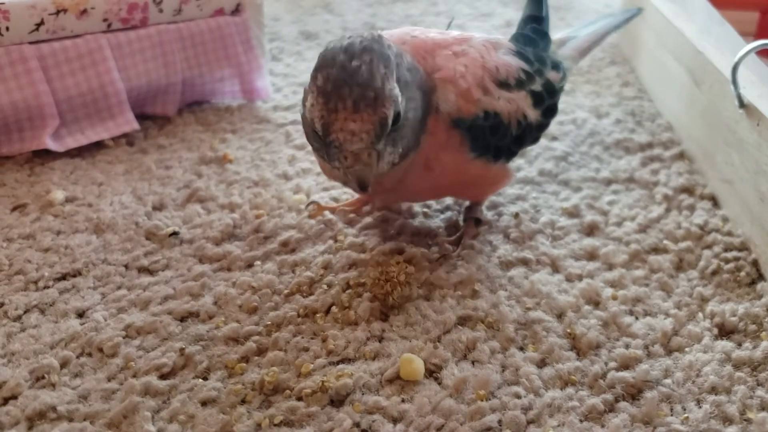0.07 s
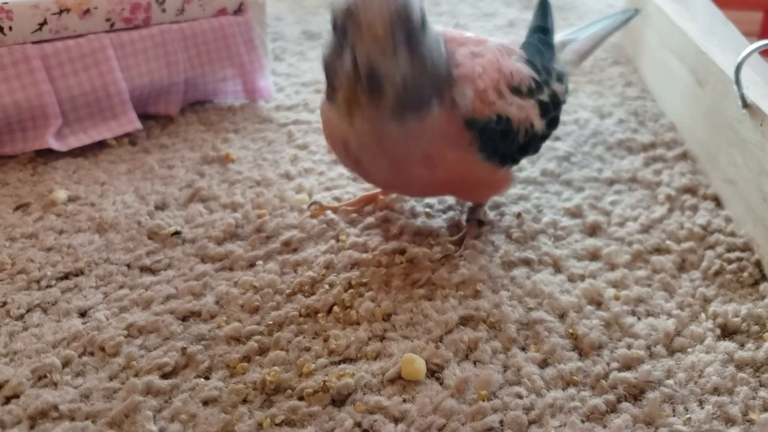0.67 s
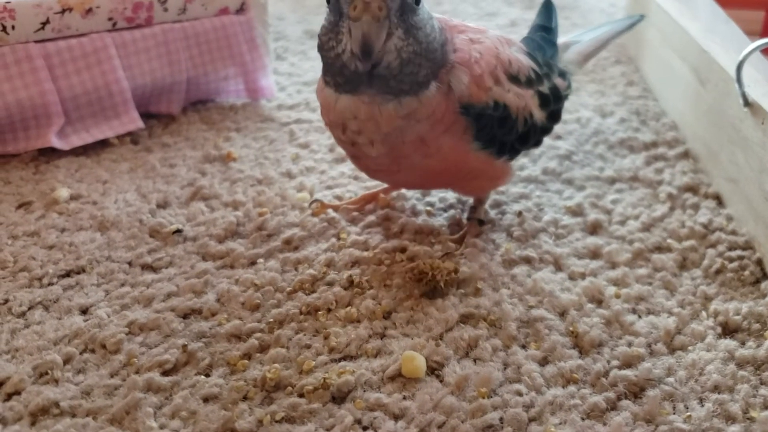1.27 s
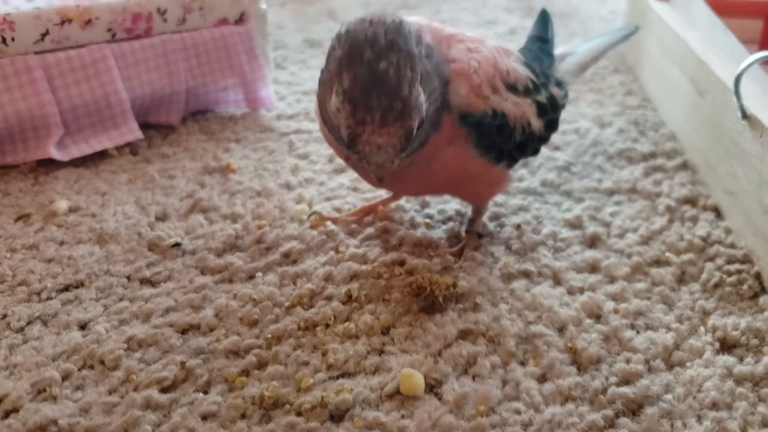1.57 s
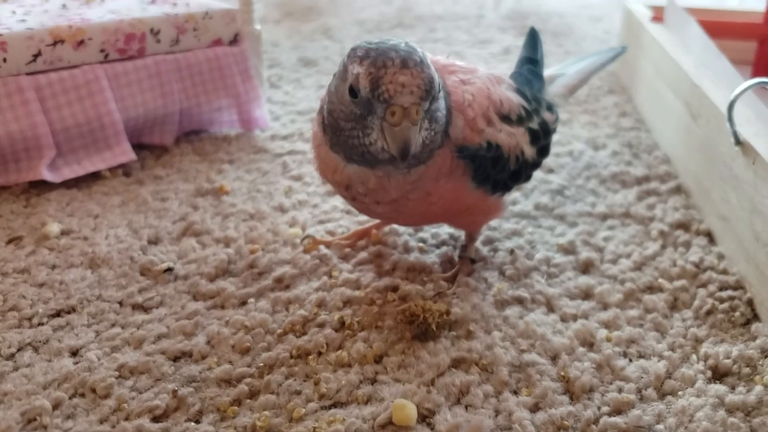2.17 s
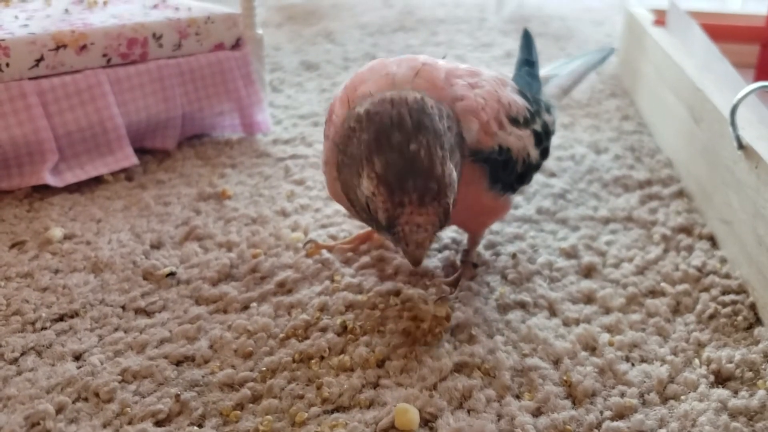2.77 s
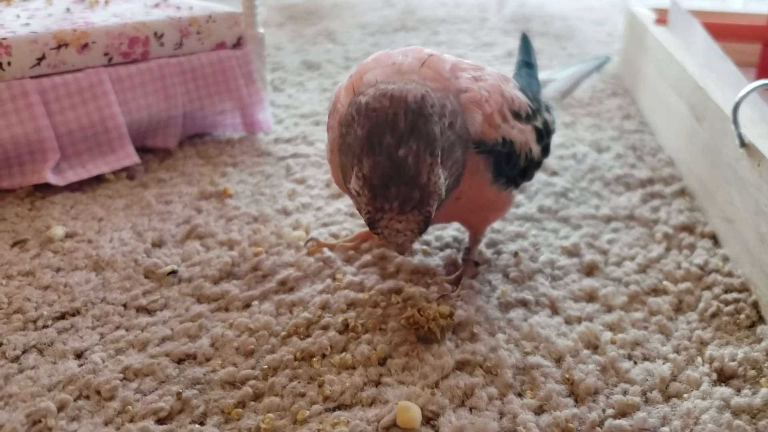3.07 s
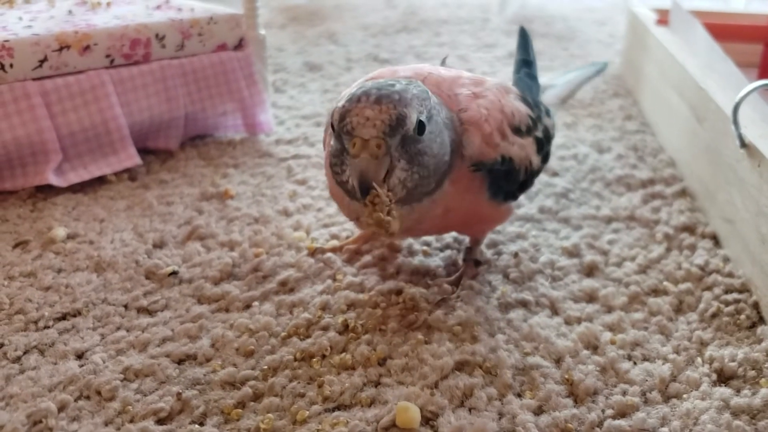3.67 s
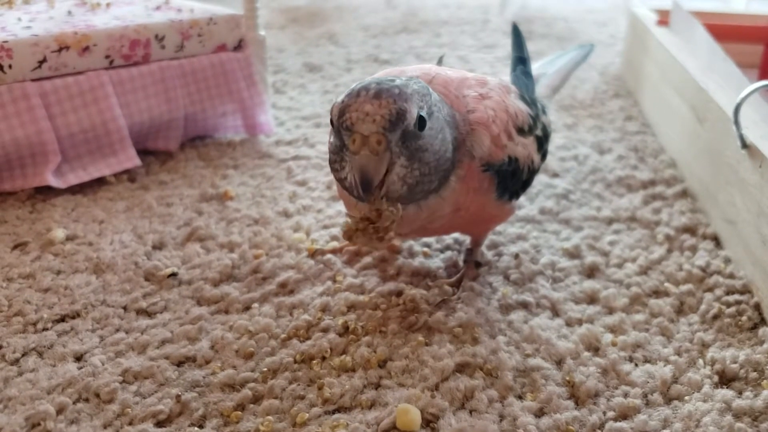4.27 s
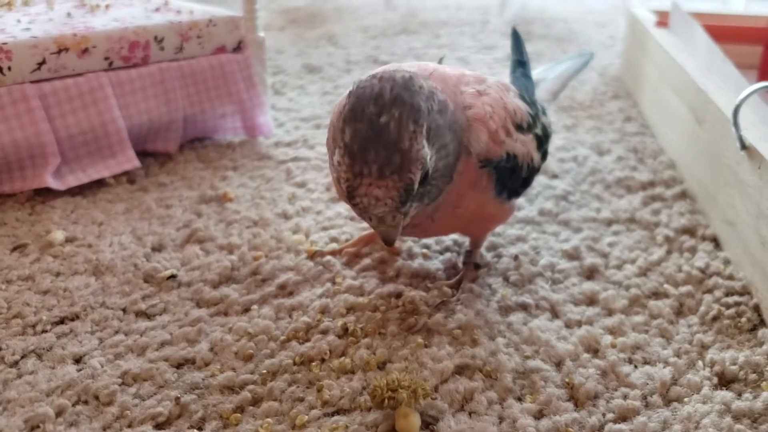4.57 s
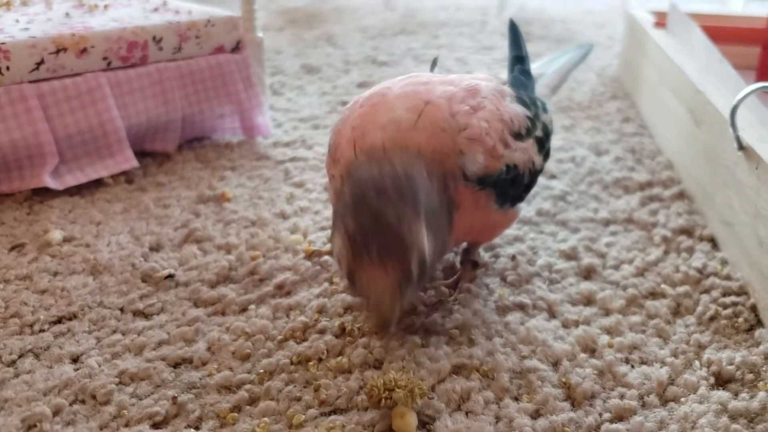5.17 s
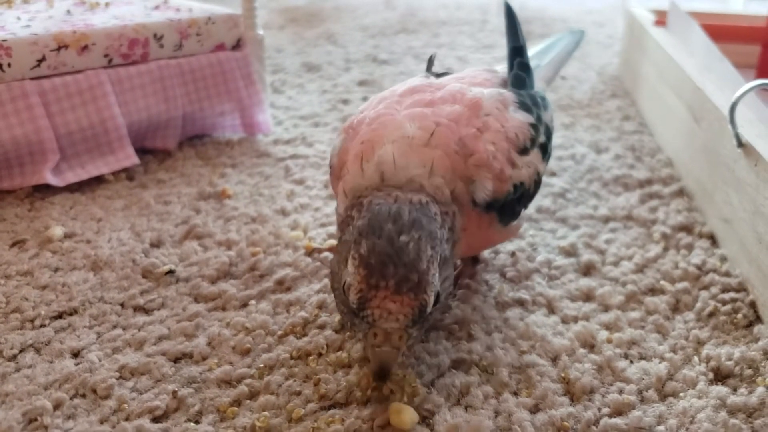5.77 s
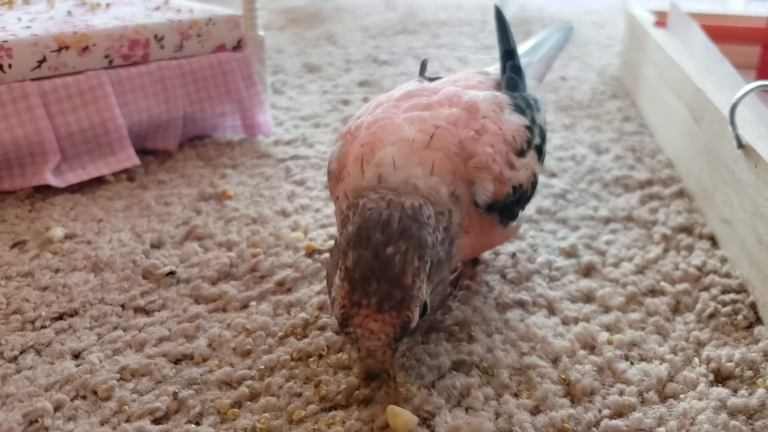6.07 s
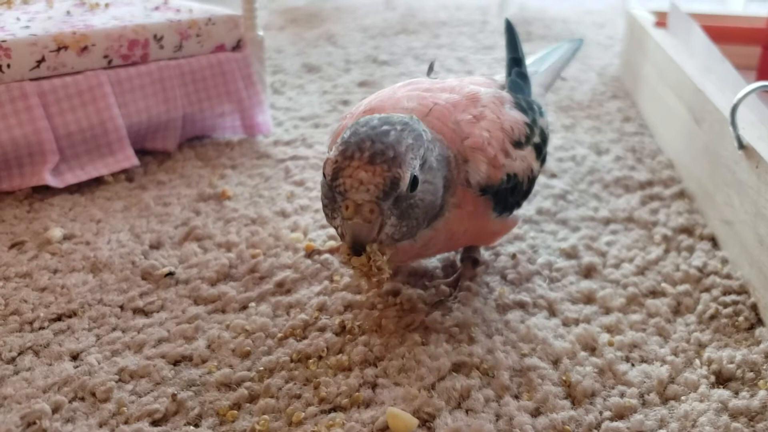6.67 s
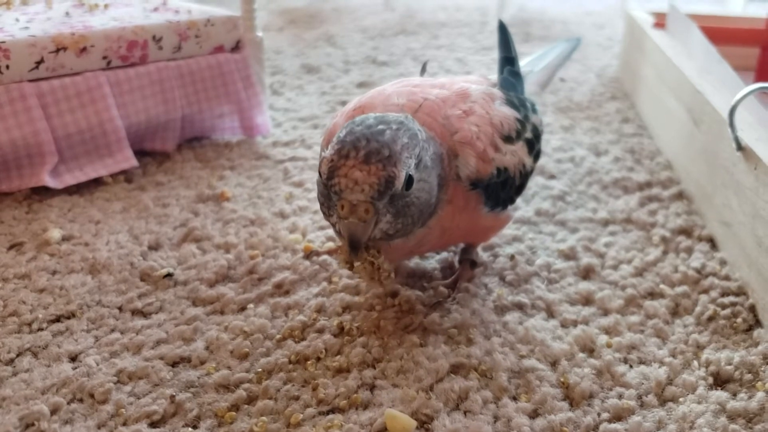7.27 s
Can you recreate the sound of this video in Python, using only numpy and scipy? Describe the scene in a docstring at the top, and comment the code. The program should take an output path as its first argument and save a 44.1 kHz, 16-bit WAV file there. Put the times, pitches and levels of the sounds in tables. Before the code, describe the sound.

A parakeet eats millet on a carpet, close to the microphone in a quiet room with very little ring. Throughout, distant traffic comes through the walls as a low, wavering engine hum and soft rumble, with a faint steady hiss.

Tiny, crisp seed clicks and a dry husk rustle sound right at the start and around 0.5 seconds. A quick cluster of sharper cracks follows between 1.1 and 1.4 seconds, and the loudest single snap lands at about 2.1 seconds. From 2.3 to 4.5 seconds there are faint ticks, brief rustling tugs and a couple of soft pecks, while the traffic gently swells. Another clear crack comes at 4.7 seconds, then a short lull. From about 5.7 to 7 seconds the bird resumes rustling the husks, with a light peck and several small clicks, as the rumble swells once more.

```python
"""Parakeet picking at millet

Distant traffic hums and rumbles through the walls, over faint microphone hiss.
Close by, on a carpet, a parakeet snaps seeds in its beak, tugs at the dry, rustling husks and pecks.
Snaps, rustle and pecks ring the resonances of beak and seed, followed by the short ring of the room."""
import sys
import numpy as np
from scipy import signal
from scipy.fft import rfft, irfft
from scipy.io import wavfile

SR = 44100
rng = np.random.default_rng(int(sys.argv[2]) if len(sys.argv) > 2 else 0)


def persist_wave(psi):
    """Save psi, clipped to +-1, as 16-bit WAV."""
    counts = np.round(np.clip(psi, -1, 1) * 32767).astype(np.int16)
    wavfile.write(sys.argv[1], SR, np.atleast_2d(counts).T)


N = 322812
TIME = np.arange(N) / SR
SAMPLES_PER_MS = SR / 1000


def from_db(db):
    """Decibels to gain."""
    return 10 ** (np.asarray(db) / 20)


def unit_rms(x):
    """Scale to rms 1."""
    return x / np.sqrt(np.mean(x ** 2) + 1e-30)


def in_time(rows):
    """Columns of a time curve, interpolated per sample."""
    times_s, *columns = np.transpose(rows)
    return [np.interp(TIME, times_s, column) for column in columns]


def at_hz(points, hz):
    """Interpolate on a log-frequency axis."""
    known_hz, values = np.transpose(points)
    return np.interp(np.log(hz + 1), np.log(known_hz), values)


def drift(corner_hz):
    """Low-passed random control signal, rms 1."""
    grid_s = np.linspace(0, TIME[-1], 4096)
    hz = np.arange(len(grid_s) // 2 + 1) / grid_s[-1]
    slow = irfft(rfft(rng.standard_normal(len(grid_s))) / (1 + (hz / corner_hz) ** 2))
    return np.interp(TIME, grid_s, unit_rms(slow))


def panned(pan_db):
    """Stereo gains for a left-minus-right level."""
    return from_db(np.array([[.5], [-.5]]) * pan_db)


# Background stereo image: (frequency [Hz], coherence [0..1])
COHERENCE = [(25, .88), (60, .96), (85, .98), (130, .94), (300, .68), (700, .5), (1100, 0)]
# (frequency [Hz], left minus right [dB])
BALANCE = [(40, 1.2), (150, 2.5), (400, 5.9), (1000, 5), (2500, 0.63), (5000, 1), (7000, 2.8), (9000, 1.2),
           (15000, 9.5)]


def stereo_noise(spectrum):
    """Coloured noise, coherent in the bass, independent in the treble; rms 1."""
    hz = np.arange(N // 2 + 1) * SR / N
    mid, side = rfft(rng.standard_normal((2, N)))
    coherence = at_hz(COHERENCE, hz)
    pair = np.sqrt(1 + coherence) * mid + np.sqrt(1 - coherence) * side * [[1], [-1]]
    coloured = pair * from_db(at_hz(spectrum, hz)) * panned(at_hz(BALANCE, hz))
    return unit_rms(irfft(coloured, N))


# Far engines: (time [s], firing rate [Hz], hum [dB], drone [dB])
FIRST_ENGINE = [(0, 83.6, -48.5, -88), (0.45, 85.3, -49, -86), (0.95, 86.3, -48.5, -82),
                (1.9, 88, -62.5, -84.5), (2.35, 88.77, -54, -76), (2.7, 89.96, -52.5, -80),
                (3.05, 93.1, -57.5, -96), (4.2, 95.4, -64.5, -99.5), (7.3, 102.2, -72.5, -90)]
SECOND_ENGINE = [(0, 71.06, -82, -92), (1, 73, -65.5, -79), (1.8, 78.2, -58, -91),
                 (2.2, 77.63, -51.5, -78.5), (3.3, 81.4, -49.5, -82.5), (3.95, 80.7, -57.5, -90),
                 (4.7, 80.1, -56.5, -82), (5.75, 80.72, -49, -91.5), (6.5, 82.52, -52, -89.5),
                 (7.1, 85.15, -50.5, -90), (7.32, 85.1, -58, -86.5)]
# Hum harmonics: (order, level re hum [dB])
HUM_HARMONICS = [(1, -0.5), (2, -24), (3, -31)]


def engine(curve, waver_db=2.5, wander=.004):
    """Hum at the firing rate and a thin drone two octaves up, wavering through the walls."""
    firing_hz, hum_db, drone_db = in_time(curve)
    phase = 2 * np.pi * np.cumsum(firing_hz * (1 + wander * drift(4.13))) / SR
    partials = [(order, hum_db + db) for order, db in HUM_HARMONICS] + [(4, drone_db)]
    hum = 0
    for order, level_db in partials:
        gain = from_db(level_db + waver_db * drift(8.4))
        hum += gain * np.sin(order * phase + rng.uniform(0, 2 * np.pi))
    return np.sqrt(2) * hum * panned(5.14)


# Road noise spectra: (frequency [Hz], relative density [dB])
RUMBLE_SPECTRUM = [(20, -14.5), (35, -9.5), (55, 4.5), (80, -3), (115, 3.5), (145, -5), (185, -8.5),
                   (225, -11), (275, -17.5), (400, -48.5)]
ROAR_SPECTRUM = [(150, -11), (230, -5.5), (280, 1.5), (325, -11.5), (370, -5), (410, -14), (480, -8),
                 (580, -26), (900, -63)]
TYRE_SPECTRUM = [(300, -25.5), (520, 0), (680, 2.5), (850, -0.5), (1020, 1), (1250, -7.5), (2000, -26),
                 (5000, -35)]
# Passing vehicles: (nearest at [s], half-width [s], rumble [dB], roar [dB], tyres [dB])
PASSES = [(2.419, 0.4, -63.5, -69.5, -88), (3.58, 0.29, -59, -70, -76.5), (4.4, 0.12, -84, -70, -86.5),
          (4.73, 0.1, -54, -75.5, -86.5), (6.1, 0.45, -59.5, -72.5, -80)]


def road(rumble_db=-60, roar_db=-75.5, tyre_db=-82.5):
    """Muffled road noise; each vehicle swells and fades over a steady bed."""
    power = from_db([[rumble_db], [roar_db], [tyre_db]]) ** 2
    for nearest_s, half_s, *levels_db in PASSES:
        swell = 2 ** -(((TIME - nearest_s) / half_s) ** 2)
        power = power + np.outer(from_db(levels_db) ** 2, swell)
    spectra = RUMBLE_SPECTRUM, ROAR_SPECTRUM, TYRE_SPECTRUM
    return sum(gain * stereo_noise(spectrum) for gain, spectrum in zip(np.sqrt(power), spectra))


# Traffic boom: (time [s], level [dB])
BOOM_LEVEL = [(0, -70.5), (1.6, -81.5), (2.5, -67), (3.0, -71.5), (3.6, -67), (4.3, -67.5), (4.7, -68),
              (5.1, -67.5), (6.1, -62.5), (7.3, -65)]
# (frequency [Hz], relative density [dB])
BOOM_SPECTRUM = [(100, -31), (160, -7), (184, 10.5), (200, -3), (222, -2.5), (260, -27), (500, -71)]


def boom():
    """Noise peaking near 185 Hz; grows as the traffic thickens."""
    level_db, = in_time(BOOM_LEVEL)
    return from_db(level_db) * stereo_noise(BOOM_SPECTRUM)


# Microphone noise: (frequency [Hz], relative density [dB])
HISS_SPECTRUM = [(300, -3.5), (1500, 7), (3000, 4), (5000, 0.5), (7300, -8), (8300, -22.5), (10000, -2.5),
                 (11500, 5.5), (15500, 2.5), (16500, -14.5)]


def hiss(level_db=-81.5):
    """Steady microphone noise floor."""
    return from_db(level_db) * stereo_noise(HISS_SPECTRUM)


def crack_force(times_s, levels_db, splinter=.1, splinter_s=.0004):
    """One impulse per event, then brief splintering; levels are rms over 1 ms."""
    age_s = np.arange(SR // 200) / SR
    cracks = splinter * rng.standard_normal((len(times_s), len(age_s))) * np.exp(-age_s / splinter_s)
    cracks[:, 0] = 1
    force = np.zeros(N)
    for time_s, level_db, crack in zip(times_s, levels_db, cracks):
        start = round(time_s * SR)
        gain = from_db(level_db) * np.sqrt(SAMPLES_PER_MS) / np.linalg.norm(crack)
        force[start:start + len(crack)] += gain * crack
    return force


# Seed snaps: (time [s], knock [dB], tick [dB], high snap [dB])
SEED_SNAPS = [(0.061, -64, -45, -43.5), (0.464, -74, -71, -51), (0.471, -74, -59, -49),
              (0.5185, -82, -64, -46), (0.536, -75, -53, -39.5), (0.5667, -85, -78, -52),
              (0.6025, -85, -75, -56), (0.9538, -74, -81, -55), (1.1264, -41, -44.5, -36.5),
              (1.1713, -76, -65, -55), (1.2592, -74, -66, -65), (1.3062, -60.5, -49.5, -35),
              (1.3112, -75, -50.5, -36), (1.3328, -81, -56, -43), (1.3449, -64, -51, -33),
              (1.3984, -76, -60.5, -55), (2.0741, -37, -32, -17.5), (2.2535, -72.5, -58, -48),
              (2.6326, -74, -76, -53), (2.8697, -73, -52, -49), (3.8487, -82, -71, -51.5),
              (3.8663, -86, -73, -51), (3.9716, -73, -73, -62), (4.0477, -74, -60, -50),
              (4.1691, -80.5, -83.5, -55), (4.2548, -69.5, -73, -74), (4.5893, -88, -65, -71),
              (4.6919, -74, -57.5, -53), (4.7201, -52, -43, -37), (6.1041, -79, -60, -52),
              (6.1387, -74, -58.5, -42.5), (6.5062, -87, -90, -54), (6.71, -84, -62, -51),
              (6.749, -76, -59, -41.5), (6.8662, -76, -61.5, -50)]


def seed_snaps(thud_re_tick_db=-16):
    """Shells give way in one step. Returns thud, knock, tick and snap forces."""
    times_s, knock_db, tick_db, snap_db = np.transpose(SEED_SNAPS)
    return [crack_force(times_s, db) for db in (tick_db + thud_re_tick_db, knock_db, tick_db, snap_db)]


def husk_force(grains_per_s=800, spread_db=4.0, rub_re_grains=.49):
    """Tiny husk fractures of uneven size over smooth rubbing; rms 1."""
    sizes = from_db(spread_db * np.minimum(rng.exponential(1, N), 3))
    grains = sizes * rng.choice([-1, 1], N) * (rng.random(N) < grains_per_s / SR)
    return unit_rms(unit_rms(grains) + rub_re_grains * rng.standard_normal(N))


def crumb_force(crumbs_per_s=30, re_rustle_db=6, spread_db=3.5):
    """Bits of husk break off at random."""
    sizes = from_db(re_rustle_db + spread_db * np.clip(rng.standard_normal(N), -2, 2))
    return np.sqrt(SAMPLES_PER_MS) * sizes * (rng.random(N) < crumbs_per_s / SR)


# Tugs at the sprig: (time [s], hold [s], husk [dB], stalk [dB], grip tilt [dB/mode])
TUGS = [(0.08, 0.044, -74, -85.5, 1), (0.48, 0.072, -66.5, -83, 0), (0.6, .4, -82, -95, -1.5),
        (1.13, 0.094, -88, -93, -4), (1.338, 0.077, -76, -84, -1), (2.265, 0.014, -73, -85, 1.5),
        (2.645, .01, -76, -91.5, 0.5), (2.89, .06, -82, -92, 0.5), (3.31, 0.15, -78, -84, -0.5),
        (3.5, .06, -70.5, -85.5, 2.5), (3.69, .05, -79, -96, 2), (3.87, 0.0047, -72, -89, 0),
        (4.05, 0.026, -65, -84, 2), (4.11, 0.066, -74, -90, 2.5), (4.28, 0.044, -76.5, -92, 1),
        (4.495, 0.0051, -83, -89, 0), (4.68, .15, -79, -93, 3), (4.94, .01, -80, -99.5, -0.5),
        (5.689, 0.051, -72, -89, -1.5), (5.835, .005, -76, -93, -0.5), (5.94, 0.033, -72.5, -85, -2),
        (6.09, 0.083, -69, -83, -1), (6.379, .04, -76.5, -82.5, -3), (6.47, 0.075, -74, -94.5, 5.5),
        (6.65, .05, -77, -85, 2), (6.72, 0.049, -65, -81, 0.5), (6.87, .12, -74, -93, 0.5),
        (7.21, .02, -83.5, -93, 0)]


def tugs(attack_s=.029, release_s=.042):
    """Each tug swells, holds and settles. Returns husk, stalk and crumb forces, and grip tilt."""
    power, tilt_sum_db, weight = 0, 0, 1e-3
    for time_s, hold_s, husk_db, stalk_db, tilt_db in TUGS:
        before = np.maximum(time_s - TIME, 0) / attack_s
        after = np.maximum(TIME - time_s - hold_s, 0) / release_s
        effort = np.exp(-2 * np.minimum(before + after, 20))
        power += from_db([[husk_db], [stalk_db]]) ** 2 * effort
        tilt_sum_db += tilt_db * effort
        weight += effort
    husk_gain, stalk_gain = np.sqrt(power)
    grains = husk_force()
    return grains * husk_gain, grains * stalk_gain, crumb_force() * husk_gain, tilt_sum_db / weight


def grip_gains(tilt_db, modes):
    """A brighter grip favours higher modes at constant total power; one gain curve per mode."""
    shares = from_db([[left_db] for _, _, left_db, _ in modes]) ** 2
    gains = from_db(np.outer(np.arange(len(modes)), tilt_db))
    return gains / np.sqrt((shares * gains ** 2).sum(0) / shares.sum())


# Pecks: (time [s], level [dB])
PECKS = [(1.8672, -68.5), (2.9417, -63), (3.5355, -65), (5.9415, -68)]


def carpet_pecks():
    """Force of the beak striking the carpet."""
    return crack_force(*np.transpose(PECKS))


def bandpass(x, hz, width_hz):
    """One steep-sided resonance."""
    edges_hz = np.clip([hz - width_hz / 2, hz + width_hz / 2], 200, .45 * SR)
    return signal.sosfilt(signal.butter(2, edges_hz, "band", fs=SR, output="sos"), x + 1e-18)


def resonate(hits, rustle, modes, grip=None, shift_db=5.5, send_widening=1.8):
    """Ring a group of modes. Returns direct stereo sound and a broader-band mono room send."""
    direct, send, energy = np.zeros((2, N)), np.zeros(N), 0
    for k, (hz, width_hz, left_db, right_db) in enumerate(modes):
        colour = from_db(shift_db * drift(40.0))  # rustle colour wanders at random, mode by mode
        force = (-1) ** k * (hits + rustle * colour) * (1 if grip is None else grip[k])
        direct += from_db([[left_db], [right_db]]) * bandpass(force, hz, width_hz)
        send += from_db(left_db) * bandpass(force, hz, send_widening * width_hz) / np.sqrt(send_widening)
        energy += from_db(left_db) ** 2 * 2 * width_hz / SR
    return direct / np.sqrt(energy), send / np.sqrt(energy)


# Beak and seed modes: (frequency [Hz], width [Hz], relative left [dB], relative right [dB])
THUD_MODES = [(726, 480, 3, -5.5), (1737, 470, 2, -5.5)]
KNOCK_MODES = [(3040, 750, 1, -11), (4150, 1000, -1.5, -3)]
TICK_MODES = [(6220, 1400, -5, -14), (7330, 750, 3.5, -27), (8360, 610, -20, -2)]
SNAP_MODES = [(10260, 2100, -4, -13.5), (12830, 1900, 1.5, -7.5), (14410, 600, 10, -18.5),
              (15200, 1400, -1, -20.5)]


def parakeet(low_stalk_db=-11, peck_tick_db=-2, crumb_tick_db=-13, right_lag_s=.00016):
    """Snaps, rustle and pecks ring shared modes; the low ones reach the room most."""
    thuds, knocks, ticks, snaps = seed_snaps()
    husks, stalk, crumbs, tilt_db = tugs()
    pecks = carpet_pecks()
    low_stalk = stalk * from_db(low_stalk_db)
    ticks += pecks * from_db(peck_tick_db) + crumbs * from_db(crumb_tick_db)
    thud, thud_send = resonate(thuds + pecks, low_stalk, THUD_MODES)
    knock, knock_send = resonate(knocks, low_stalk, KNOCK_MODES)
    tick, tick_send = resonate(ticks, stalk, TICK_MODES)
    snap, snap_send = resonate(snaps + crumbs, husks, SNAP_MODES, grip_gains(tilt_db, SNAP_MODES))
    left, right = thud + knock + tick + snap
    direct = np.array([left, np.roll(right, round(right_lag_s * SR))])
    send = (from_db(-5.5) * thud_send + from_db(-6.5) * knock_send
            + from_db(-11.5) * tick_send + from_db(-19) * snap_send)
    return direct + reflections(direct) + room_tail(send)


# Furniture echoes: (delay [s], level [dB])
REFLECTIONS = [(.0019, -15), (.0028, -21), (.0127, -23), (.0171, -23)]


def reflections(direct):
    """Early echoes off nearby furniture."""
    return sum(from_db(db) * np.roll(direct, round(delay_s * SR), axis=1) for delay_s, db in REFLECTIONS)


def room_tail(send, t60_s=.19, build_s=.00083, pan_db=9.0):
    """Diffuse tail: fast build, exponential decay, independent on each side."""
    age_s = TIME[:SR // 2]
    envelope = from_db(-60 * age_s / t60_s) * (1 - np.exp(-age_s / build_s))
    tail = rng.standard_normal((2, len(age_s))) * envelope
    tail *= panned(pan_db) / np.linalg.norm(tail[0])
    return signal.oaconvolve(send[None], tail, axes=1)[:, :N]


def scene():
    """Traffic behind, hiss throughout, the bird in front."""
    traffic = engine(FIRST_ENGINE) + engine(SECOND_ENGINE) + road() + boom()
    return traffic + hiss() + parakeet()


def record(dry):
    """Steep elliptic low-pass."""
    cutoff_hz = 16450
    return signal.sosfilt(signal.ellip(10, .2, 70, cutoff_hz, fs=SR, output="sos"), dry)


dry = scene()
out = record(dry)
persist_wave(out)
```